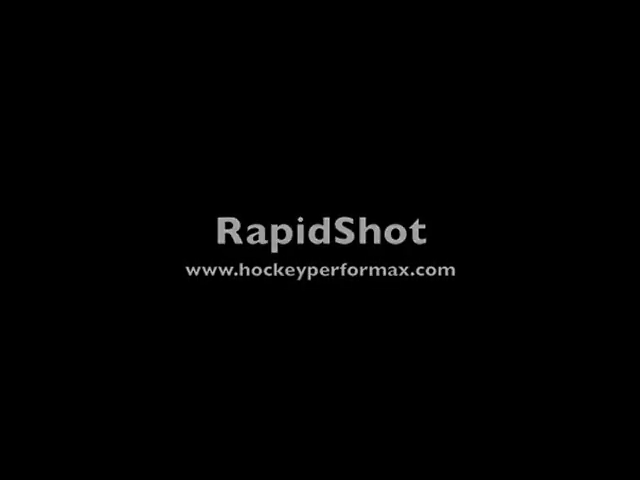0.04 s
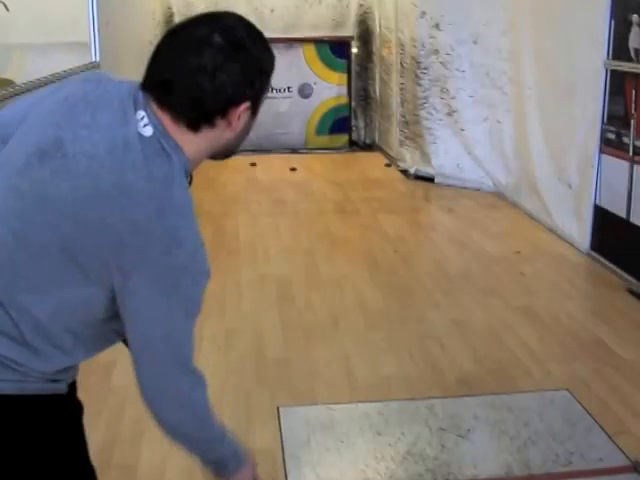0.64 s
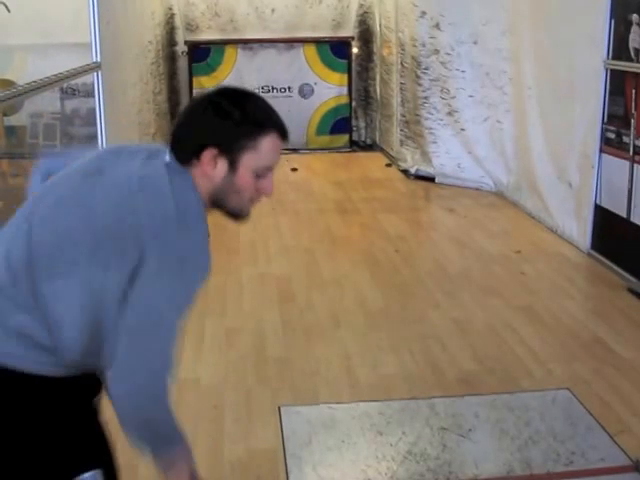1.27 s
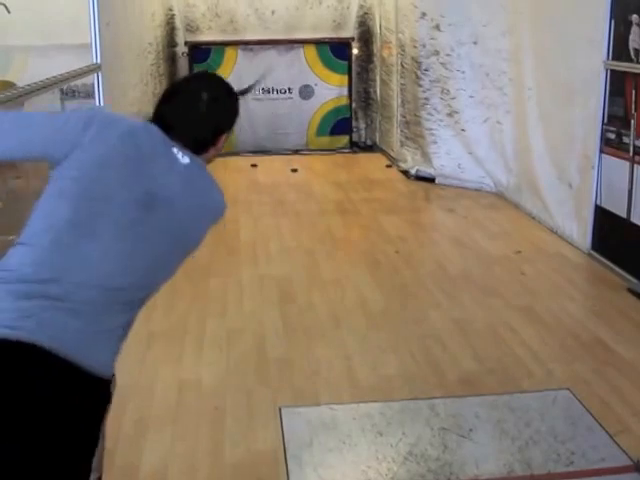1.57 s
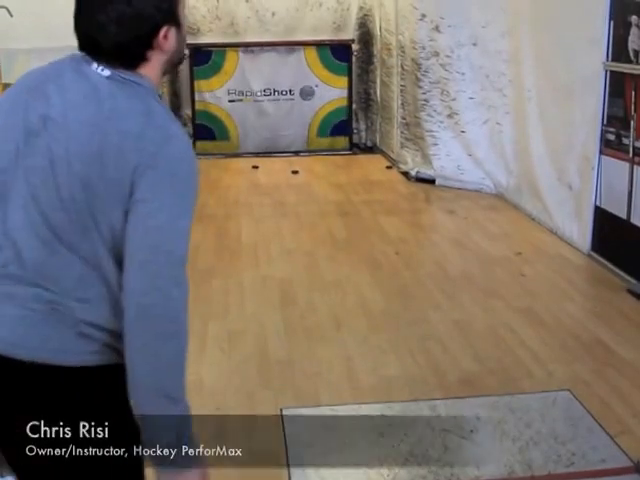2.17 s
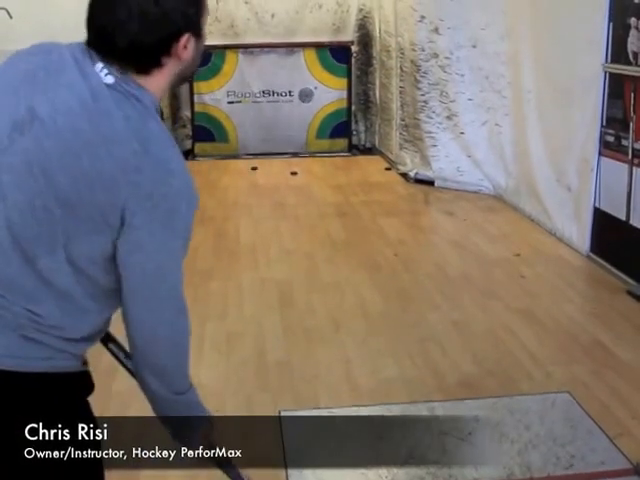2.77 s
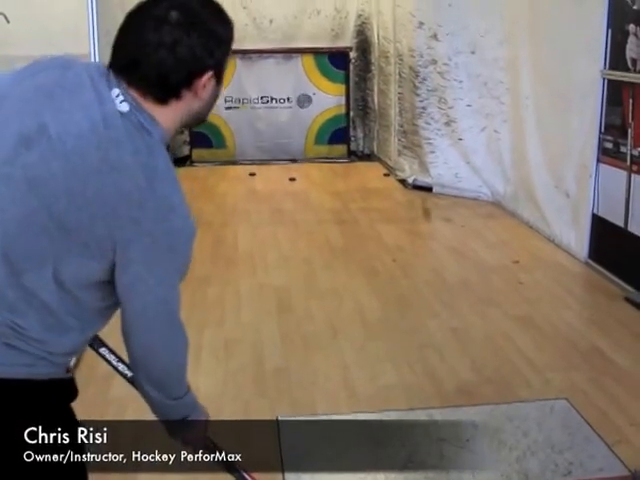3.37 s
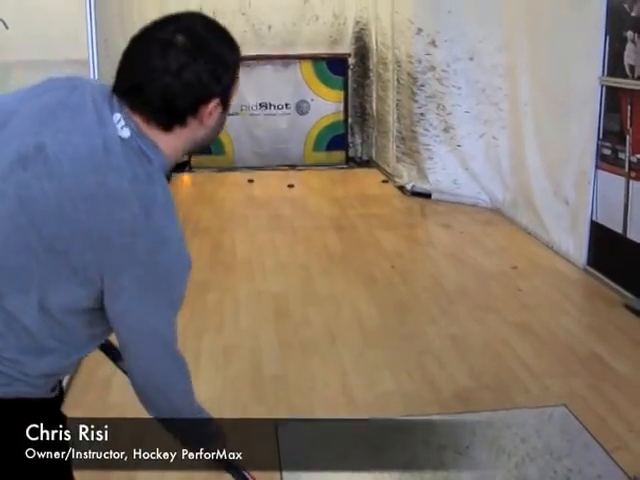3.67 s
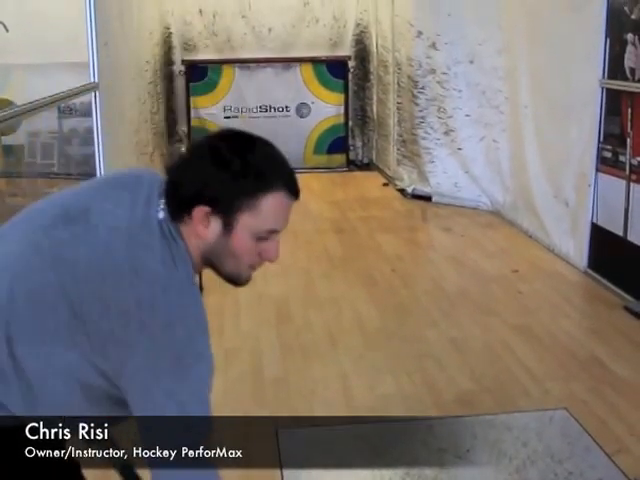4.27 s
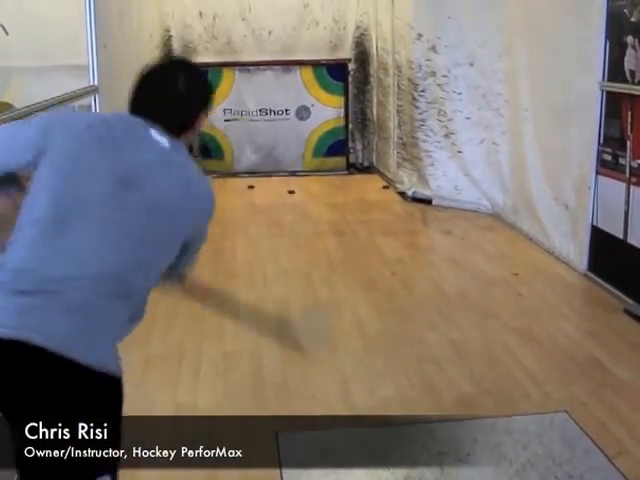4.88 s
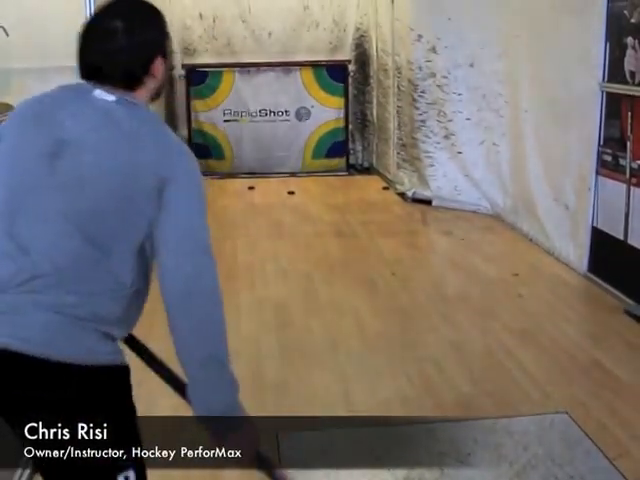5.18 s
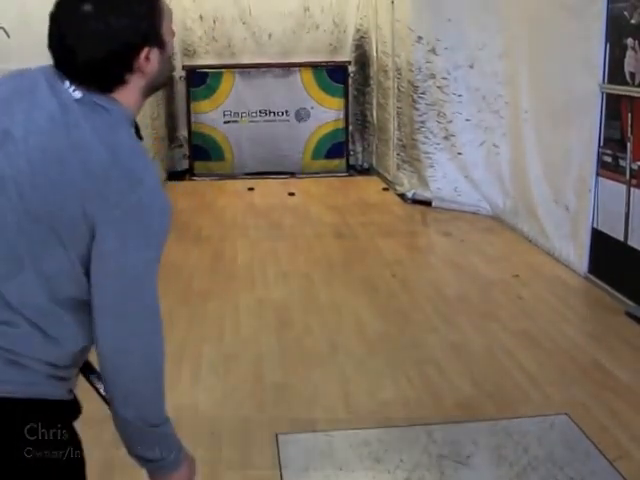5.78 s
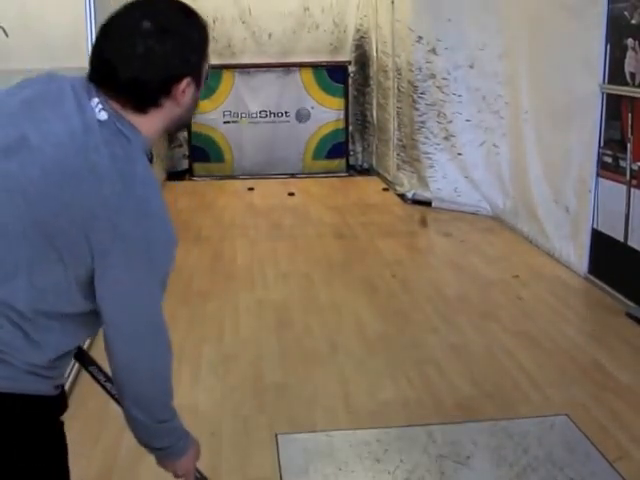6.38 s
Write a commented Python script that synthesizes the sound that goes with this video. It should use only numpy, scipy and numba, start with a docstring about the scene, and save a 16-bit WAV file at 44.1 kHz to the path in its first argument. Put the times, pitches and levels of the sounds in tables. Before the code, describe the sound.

After half a second of silence, a low machine rumble and hum fade in, filling a large echoing hall. At about 0.6 seconds a puck cracks sharply against a hockey stick's blade. The blade scrapes with a slight squeak and slaps the puck away at 1.3 seconds; it thuds into a target sheet at 1.7. Around 2.2 it drops and bounces on the wooden floor, and distant clunks follow near 3 seconds. A second puck slides in with a soft rush and cracks on the blade at 3.8. It is swept and shot at 4.5, hitting the target at 4.9. Loose pucks clunk and rattle until about 6.2, with faint shuffling, and the feeder starts another rush just at the end. The loudest blows overload briefly, and their echo swells back up afterwards.

```python
"""A large echoing hall, where hockey shots are practised over the rumble and hum of a puck feeder.
Twice a puck slides in, cracks against the stick's blade, is swept along and shot, then thuds into
the target sheet and clatters down. A third puck is fed as the sound ends. Each blow is a short force
that makes a body ring; sliding and scraping are grainy noise. An automatic gain control turns loud
blows down and lets the echo swell back up. It reacts slowly, so their first instants overload."""
import sys
import numpy as np
from scipy import signal
from scipy.fft import rfft, irfft, next_fast_len
from scipy.io import wavfile
from numba import njit

SR = 44100
rng = np.random.default_rng(int(sys.argv[2]) if len(sys.argv) > 2 else 0)


def to_wav(sig):
    """Store sig (one row per channel, or 1-D mono) as 16-bit WAV at the path in sys.argv[1].

    Samples outside -1..1 are clipped; the rate is SR.
    """
    pcm = np.clip(np.atleast_2d(sig), -1, 1) * 32767
    pcm = np.round(pcm).astype(np.int16)
    wavfile.write(sys.argv[1], SR, pcm.T)  # frames by channels


N = 284004

# Levels in the tables are relative. A mode is one way a body rings; a tuning multiplies its pitch
# and width. Sound above a treble edge is dulled.
# Rumble of the machine and ventilation. Each row: frequency in Hz, level in dB.
RUMBLE_COLOUR = [(20, -47.5), (50, -14.5), (100, 3), (250, 0), (550, -3.5), (900, 5.5), (1700, -10),
                 (3500, -29), (7000, -31), (11000, -50.5), (16000, -72)]
# The feeder sends a puck up the lane. Each row: start in seconds, drive level in dB, slide level in dB.
FEEDS = [(0.04, -18, -17), (3.157, -18, -18), (6.183, -14.5, -38)]
# Noise of a puck driven out and sliding. Each row: frequency in Hz, level in dB.
SLIDE_COLOUR = [(50, -8.5), (130, 1.5), (300, 4), (800, 3), (1600, 0), (3200, -4.5), (5000, -14.5),
                (8000, -21), (11000, -36), (16000, -46)]
# Pucks and feet on the floor. Each row: start in seconds, level in dB, contact time in seconds, tuning.
FLOOR_HITS = [(0.594, -15, .012, 1.05), (2.231, -10.5, .035, 3.4), (3.03, -15, 0.012, 1.09),
              (3.738, -23, 0.015, 1.35), (4.95, -16.5, 0.045, 1.05), (5.365, -17.5, 0.011, 1.3),
              (5.805, -16.5, 0.018, 1.13)]
# Modes of the wooden floor. Each row: pitch in Hz, width in Hz, level in dB.
FLOOR_MODES = [(126.3, 23, 1.5), (236, 90, -5.5), (380, 175, -5.5), (670, 130, -18.5), (1080, 230, -31.5)]
# The blade stops a puck. Each row: start in seconds, level in dB, blade tuning, treble edge in Hz,
# level of the shaft's knock in dB compared with the blade.
CATCHES = [(0.6264, 2, 1.026, 9860, -19), (3.7566, 0, 1.49, 5970, -6.5)]
# Modes of the free blade. Each row: pitch in Hz, width in Hz, level in dB.
BLADE_MODES = [(750, 202, -2.5), (940, 160, -3.5), (1372, 294, -2.5), (1850, 660, -4), (2570, 880, -5),
               (3750, 1720, -9), (5570, 2400, -13.5)]
# The puck leaves the blade. Each row: start in seconds, level in dB, treble edge in Hz,
# sweep level in dB, seconds by which the squeak comes first.
SHOTS = [(1.3493, -6, 4450, -24.5, 0.094), (4.5212, -8, 5440, -24, 0.113)]
# Modes of the loaded shaft and shooting pad. Each row: pitch in Hz, width in Hz, level in dB.
SHAFT_MODES = [(260, 420, -14.5), (530, 124, -4.5), (814, 200, -2), (978, 79, 0.5), (1380, 200, -8.5),
               (2030, 290, -6.5), (2930, 1100, -12), (6070, 13000, -25.5)]
# Small ticks of stick and skates. Each row: start in seconds, level in dB.
TICKS = [(0.959, -35), (4.286, -44), (4.376, -39), (5.056, -40), (5.70, -43), (5.785, -35.5)]
# A shot's draw, follow-through and last brush. Each row: peak in seconds after the shot, level in dB,
# rise in seconds, fall in seconds.
SWING = [(-.08, -2, 0.055, 0.046), (.018, 0, 0.02, 0.031), (.225, -17.5, .025, .09)]
# Stick and feet shuffle. Each row: peak time in seconds, level in dB, rise in seconds, fall in seconds.
SHUFFLES = [(2.255, -42.5, .11, .008), (2.76, -43, .008, .07), (2.865, -36, 0.014, 0.13),
            (4.95, -36.5, 0.077, 0.072), (5.55, -46, 0.17, .6), (6.13, -46, 0.091, 0.11)]
# The blade grating over the pad. Each row: frequency in Hz, level in dB.
SWEEP_COLOUR = [(200, 1), (700, 2), (1500, 6), (2400, -2.5), (3500, -4.5), (5000, -14), (8000, -18.5),
                (11000, -27.5), (16000, -38)]
# The blade squeaks as it sticks and slips. Each row: pitch in Hz, width in Hz, level in dB.
SQUEAK_MODES = [(2685, 900, -3), (3380, 740, -11.5), (5330, 1600, -4.5)]
# A puck hits the target. Each row: start in seconds, level in dB, treble edge in Hz,
# bulge level in dB compared with the hit, bulge tuning.
TARGET_HITS = [(1.6694, -3.5, 6100, 3.5, 0.92), (4.8572, -5.5, 8900, -3.5, 0.6)]
# Modes of the target sheet. Each row: pitch in Hz, width in Hz, level in dB.
TARGET_MODES = [(135.4, 22, -2.5), (223, 30.6, -0.5), (320.4, 100, -0.5), (480, 304, -10.5),
                (800, 340, -12), (1370, 1550, -18), (2800, 1670, -22), (6700, 6700, -35.5)]
# Clunks at the lane's far end. Each row: start in seconds, level in dB, contact time in seconds,
# pitch in Hz, treble edge in Hz.
CLUNKS = [(2.243, -5, .027, 707, 1120), (3.012, -8.5, 0.014, 338, 740), (3.072, -4, 0.033, 610, 1380),
          (5.141, -10.5, 0.0061, 800, 790), (5.612, -7.5, 0.025, 317, 1100), (5.674, -10, 0.015, 383, 714),
          (5.78, -4.5, 0.032, 655, 2220)]
# Loose pucks settle. Each row: start in seconds, length in seconds, starting level in dB,
# middle pitch in Hz, treble edge in Hz.
RATTLES = [(2.271, .35, -21, 710, 930), (4.972, .58, -19.5, 600, 1600), (5.829, .33, -16.5, 904, 1290)]
# How long the hall echoes. Each row: frequency in Hz, seconds to fade by 60 dB.
HALL_DECAY = [(100, 0.98), (300, 2.21), (900, 2.51), (2000, 1.84), (3500, 1.51), (6500, 0.85),
              (10000, 0.57), (16000, 0.21)]
# What the walls send back. Each row: frequency in Hz, level in dB.
HALL_COLOUR = [(60, -18), (150, 6), (400, 3.5), (1000, 2), (3000, 0), (6500, -0.5), (10000, 2.5),
               (16000, 7.5)]
# The whole sound fades in from silence. Each row: time in seconds, gain.
FADE_IN = [(0, 0), (0.478, 0), (0.50, 0.23), (0.55, 0.46), (0.60, 0.82), (6.44, 0.88)]

CUTOFF_HZ = 16300   # no mode or treble edge goes higher
CATCH_CONTACT_S = 0.0035


def from_db(db):
    """Turn decibels into a gain."""
    return 10 ** (np.asarray(db) / 20)


def rms_one(x):
    """Scale a signal to an average power of 1."""
    return x / np.sqrt(np.mean(x ** 2) + 1e-20)


def at_hz(points, hz):
    """Read between a table's rows, giving each octave equal room."""
    known_hz, values = np.transpose(points)
    return np.interp(np.log(np.maximum(hz, 1)), np.log(known_hz), values)


def coloured(x, spectrum):
    """Make each frequency of a noise louder or softer."""
    size = next_fast_len(len(x))
    gains = from_db(at_hz(spectrum, np.fft.rfftfreq(size, 1 / SR)))
    return irfft(rfft(x, size) * gains, size)[:len(x)]


def drift(rate):
    """A random curve of size about 1 that turns about rate times a second."""
    knots = rng.standard_normal(8192)
    return rms_one(np.interp(np.arange(N) / SR * rate, np.arange(len(knots)), knots))


def stroke(s, db, rise_s, fall_s):
    """A gain that swells to its peak at time s and dies away."""
    age = np.arange(N) / SR - s
    return from_db(db) * np.exp(np.maximum(np.minimum(age / rise_s, -age / fall_s), -40))


def friction(gain, spectrum, grain_db, grains_per_s):
    """A sliding thing catches and slips on the grain of the surface."""
    slips = rng.standard_normal(N) * from_db(grain_db * drift(grains_per_s))
    return gain * rms_one(coloured(slips, spectrum))


def resonance(x, hz, width_hz):
    """Ring at one pitch; the narrower the width, the longer the ring."""
    decay = np.exp(-np.pi * width_hz / SR)
    angle = 2 * np.pi * min(hz, CUTOFF_HZ) / SR
    feedback = [1, -2 * decay * np.cos(angle), decay * decay]
    return signal.lfilter(np.array([1, 0, -1]) * (1 - decay * decay) / 2, feedback, x)


def blow(contact_s, modes, edge_hz, swell=0):
    """A rough force, sudden or swelling, rings a body's modes; softness dulls the sound."""
    age = np.arange(SR // 4) / SR / contact_s
    pressure = age ** swell * np.exp(-age)
    chatter = rfft(rng.standard_normal(len(age)) * pressure)
    even_chatter = irfft(chatter / np.abs(chatter), len(age))   # reaches all modes alike
    force = even_chatter * np.sqrt(pressure) + 1e-18
    body = sum((-1) ** k * from_db(db) * resonance(force, hz, width)
               for k, (hz, width, db) in enumerate(modes))
    body = signal.sosfilt(signal.butter(2, min(edge_hz, CUTOFF_HZ), fs=SR, output="sos"), body)
    return body * np.sqrt(SR / 100 / np.sum(body ** 2))   # same energy for every blow


def add(track, s, sound):
    """Mix a sound in at time s."""
    start = round(s * SR)
    track[start:start + len(sound)] += sound[:N - start]


def struck(hits, modes):
    """All blows on one body; where it is hit shifts its modes."""
    out = np.zeros(N)
    for s, db, contact_s, tuning, edge_hz in hits:
        tuned = [(hz * tuning, width * tuning, mode_db) for hz, width, mode_db in modes]
        add(out, s, from_db(db) * blow(contact_s, tuned, edge_hz))
    return out


def bass_cut(x, low_hz=85):
    """Cut the deep bass below low_hz."""
    return signal.sosfilt(signal.butter(3, low_hz, "high", fs=SR, output="sos"), x)


def machine(rumble_db=-30.5, hum_hz=118.9, hum_db=-39, waver_db=3.0):
    """The feeder and ventilation rumble steadily under a wavering motor hum."""
    rumble = from_db(rumble_db) * rms_one(coloured(rng.standard_normal(N), RUMBLE_COLOUR))
    hum = np.sin(2 * np.pi * hum_hz * np.arange(N) / SR + drift(11))
    return rumble + from_db(hum_db + waver_db * drift(10)) * rms_one(hum)


def puck_feeds(travel_s=.595, lane_m=13, passing_m=0.84, ramp_s=0.018):
    """The drive rushes up and fades; the sliding puck grows louder as it nears, until it is stopped."""
    gain = 0
    for s, drive_db, slide_db in FEEDS:
        age = np.arange(N) / SR - s
        distance_m = np.hypot(passing_m, lane_m * (1 - age / travel_s))
        moving = np.clip(np.minimum(age, travel_s + ramp_s - age) / ramp_s, 0, 1)
        drive = stroke(s + 0.13, drive_db, rise_s=.12, fall_s=.13)
        gain = gain + moving * (drive + from_db(slide_db) / distance_m)
    return friction(gain, SLIDE_COLOUR, grain_db=1.0, grains_per_s=910)


def wooden_floor(edge_hz=1140, drop_s=2.238, bounce_s=0.17, bounce_share=.42, loss_db=2):
    """Pucks and feet thump the boards; one puck drops and bounces ever faster and softer."""
    hits = [(*hit, edge_hz) for hit in FLOOR_HITS]
    hits.append((drop_s, 1.5, 0.018, 1, 200))   # the heavy, dull drop
    landings = drop_s + np.cumsum(bounce_s * bounce_share ** np.arange(4))
    hits += [(s, -16 - loss_db * k, 0.0036, 1.47, 1100) for k, s in enumerate(landings)]
    return bass_cut(struck(hits, FLOOR_MODES), low_hz=100)


def blade():
    """The arriving puck makes the free blade ring."""
    hits = []
    for s, db, tuning, edge_hz, _ in CATCHES:
        hits += [(s - .031, db - 38, 0.016, 2.1, edge_hz),   # a faint graze
                 (s, db, CATCH_CONTACT_S, tuning, edge_hz)]   # then the crack
    return struck(hits, BLADE_MODES)


def beamed(crack, hz=4000, width_hz=2500, gain_db=6):
    """The flat blade throws its treble straight at the listener."""
    return from_db(gain_db) * resonance(crack, hz, width_hz)


def shaft(knock_tuning=1.123, knock_edge_hz=1760):
    """The stick's shaft knocks at each catch and each shot."""
    hits = [(s, db + knock_db, CATCH_CONTACT_S, knock_tuning, knock_edge_hz)
            for s, db, _, _, knock_db in CATCHES]
    for s, db, edge_hz, _, _ in SHOTS:
        hits += [(s - .013, db - 15, 0.028, 1.19, edge_hz),   # the blade touches the pad
                 (s, db, 0.0035, 0.94, edge_hz)]   # then slaps the puck away
    return struck(hits, SHAFT_MODES)


def ticks(contact_s=0.013, edge_hz=9000):
    """Stick and skates make light, bright touches."""
    out = np.zeros(N)
    for s, db in TICKS:
        add(out, s, from_db(db) * blow(contact_s, [(2750, 1700, 12), (7000, 3800, 2)], edge_hz))
    return out


def sweep(bite_db=5.5, squeak_db=3):
    """The blade grates and squeaks over the pad in each shot; stick and feet shuffle afterwards."""
    swings = sum(stroke(s + after_s, sweep_db + db, rise_s, fall_s)
                 for s, _, _, sweep_db, _ in SHOTS for after_s, db, rise_s, fall_s in SWING)
    shuffles = sum(stroke(*row) for row in SHUFFLES)
    scrape = friction(swings + shuffles, SWEEP_COLOUR, grain_db=4.5, grains_per_s=350)
    # the blade bites as the draw begins
    bites = sum(stroke(s - lead_s, sweep_db + bite_db, rise_s=0.0087, fall_s=0.033)
                for s, _, _, sweep_db, lead_s in SHOTS)
    slips = scrape + friction(bites, SWEEP_COLOUR, grain_db=4, grains_per_s=500)
    squeak = sum(from_db(db + squeak_db) * resonance(slips, hz, width) for hz, width, db in SQUEAK_MODES)
    return scrape + squeak


def target_sheet():
    """Each puck shakes the sheet with four quick blows that make one thud."""
    hits = []
    for s, db, edge_hz, bulge_db, tuning in TARGET_HITS:
        hits += [(s, db, 0.0027, 0.97, edge_hz),   # first contact
                 (s + .004, db - 1.5, 0.025, 1.907, edge_hz),   # the sheet slaps
                 (s + .013, db + bulge_db, .01, tuning, edge_hz),   # bulges
                 (s + .09, db + bulge_db - 11.5, .01, tuning, 1470)]   # and swings back
    return bass_cut(struck(hits, TARGET_MODES))


def clunks(width_share=0.62, upper_ratio=2.5):
    """Loose pucks and feeder parts knock together, each knock swelling briefly."""
    out = np.zeros(N)
    for s, db, contact_s, hz, edge_hz in CLUNKS + rattles():
        width_hz = width_share * hz
        modes = [(hz, width_hz, 0),
                 (hz * upper_ratio, width_hz * upper_ratio, -9),
                 (3150, 60, -10)]   # a faint metal ring
        add(out, s, from_db(db) * blow(contact_s, modes, edge_hz, swell=0.9))
    return bass_cut(out)


def rattles(count=10, contact_s=.008, fall_db_per_s=20, spread_octaves=0.35):
    """Settling pucks make uneven, fading runs of knocks, listed as rows like those of CLUNKS."""
    knocks = []
    for s, length_s, db, hz, edge_hz in RATTLES:
        for k, (late, high) in enumerate(rng.random((count, 2))):
            age = length_s * (k + late) / count
            pitch_hz = hz * 2 ** (spread_octaves * (2 * high - 1))
            knocks.append((s + age, db - fall_db_per_s * age, contact_s, pitch_hz, edge_hz))
    return knocks


def hall(x, build_up_s=0.0017, echo_db=-37):
    """The walls send back dense reflections that die band by band, the treble first."""
    t = np.arange(2 * SR) / SR
    spectrum = rfft(coloured(rng.standard_normal(len(t)), HALL_COLOUR))
    hz = np.fft.rfftfreq(len(t), 1 / SR)
    centres = np.geomspace(80, 16000, 14)
    echo = 0
    for centre, share in zip(centres, np.eye(len(centres))):
        band = irfft(spectrum * at_hz(np.c_[centres, share], hz), len(t))
        echo = echo + band * np.exp(-np.log(1000) * t / at_hz(HALL_DECAY, centre))
    echo *= from_db(echo_db) * (1 - np.exp(-(t / build_up_s) ** 2))
    return signal.fftconvolve(x, echo)[:N]


def stick_echo(directions=3):
    """The stick sends a different crack in each direction; the hall blends them into a wash."""
    return sum(hall(blade() + shaft()) for _ in range(directions)) / np.sqrt(directions)


def scene():
    """Mix the direct sounds, their echoes and the machine."""
    crack = blade()
    stick = crack + shaft()
    target, floor, far = target_sheet(), wooden_floor(), clunks()
    near = ticks() + sweep()
    sliding = puck_feeds()
    direct = from_db(7.5) * stick + target + floor + from_db(-5.0) * far
    direct += from_db(2.5) * near + from_db(-3.5) * sliding + beamed(crack)
    # each place in the hall has its own reflections
    places = [from_db(-5.5) * target + from_db(-5.5) * sliding,
              from_db(-2.5) * floor + from_db(-9.5) * far + from_db(3.5) * near]
    echoes = stick_echo() + sum(hall(sent) for sent in places)
    return (direct + echoes + machine())[None]


@njit
def follow_level(size, rest, charge, keep):
    """Track loudness: climb on peaks, then sink slowly back to rest."""
    out, level = np.empty(len(size)), rest
    for i in range(len(size)):
        level = max(rest, level * keep + charge * max(size[i] - level, 0.))
        out[i] = level
    return out


def record(dry, threshold_db=-16.0, attack_s=0.053, release_db_per_s=33, ceiling=0.67):
    """Slow gain control lets sharp blows overload; then fade in and trim the lowest and highest sound."""
    rest = float(from_db(threshold_db))
    keep = float(from_db(-release_db_per_s / SR))
    level = follow_level(np.abs(dry[0]), rest, 1 / (attack_s * SR), keep)
    overloaded = np.clip(dry * rest / level, -ceiling, ceiling)
    fade = np.interp(np.arange(N) / SR, *np.transpose(FADE_IN))
    out = signal.sosfilt(signal.butter(1, 12, "high", fs=SR, output="sos"), overloaded * fade)
    return signal.sosfiltfilt(signal.ellip(8, .05, 45, CUTOFF_HZ - 300, fs=SR, output="sos"), out)


dry = scene()
out = record(dry)
to_wav(out)
```